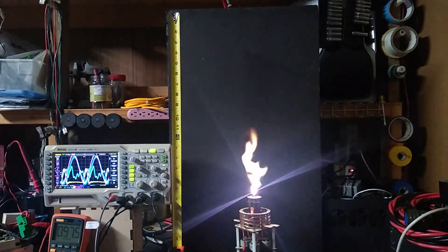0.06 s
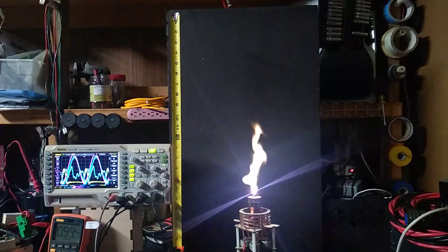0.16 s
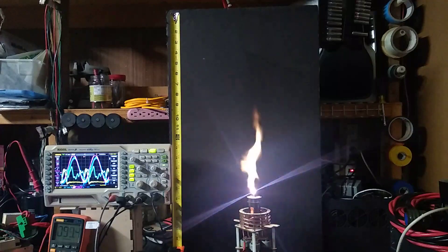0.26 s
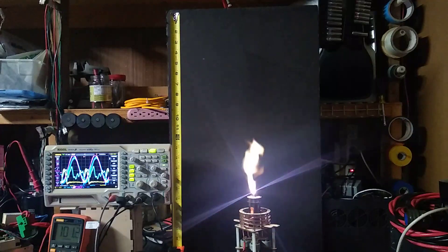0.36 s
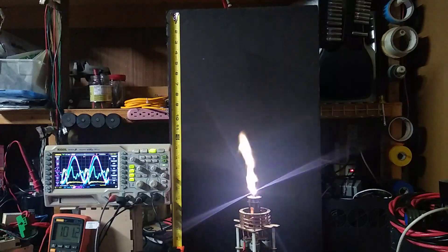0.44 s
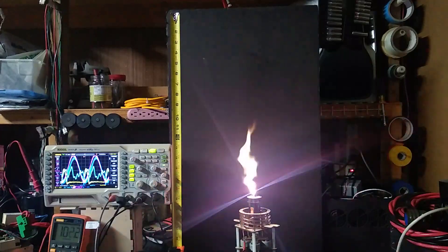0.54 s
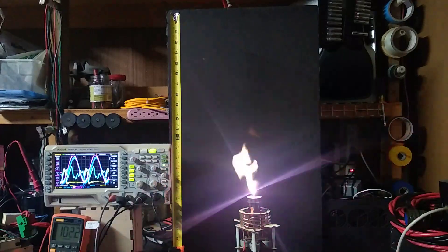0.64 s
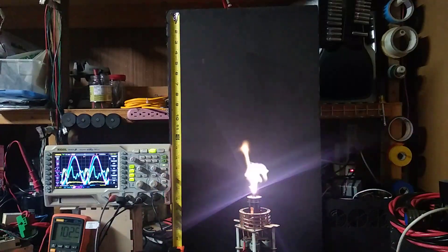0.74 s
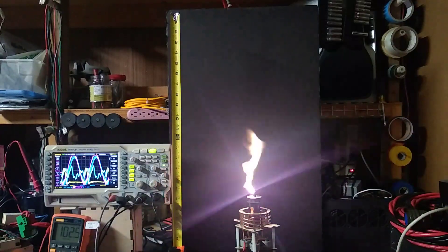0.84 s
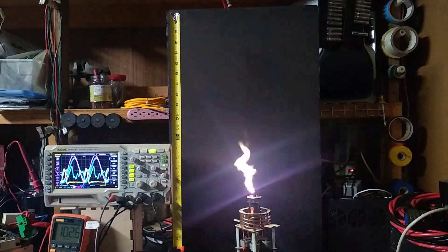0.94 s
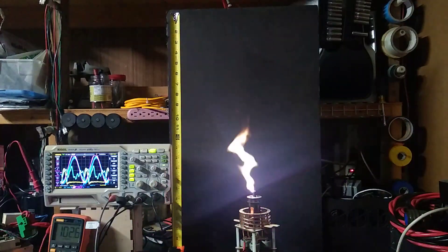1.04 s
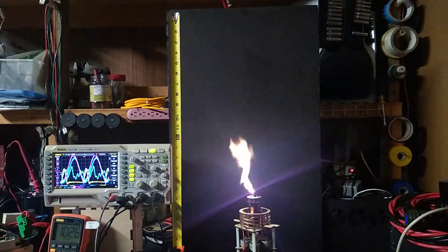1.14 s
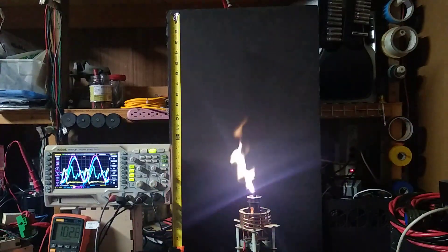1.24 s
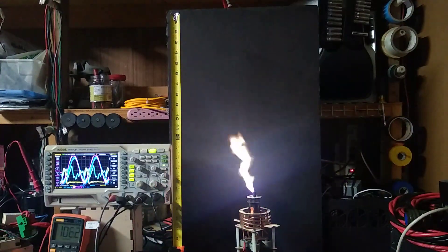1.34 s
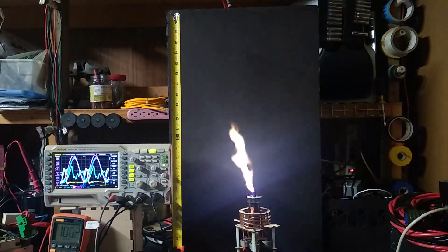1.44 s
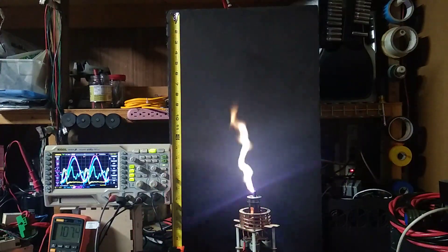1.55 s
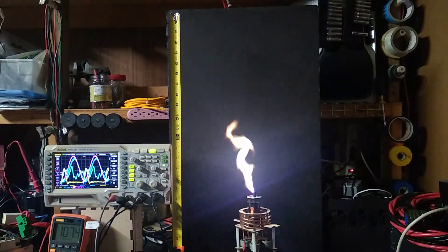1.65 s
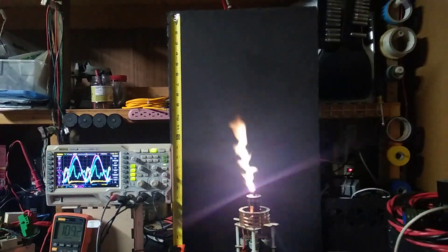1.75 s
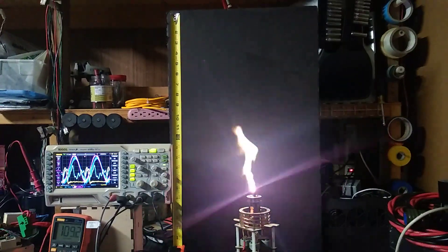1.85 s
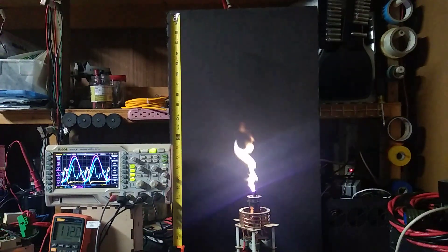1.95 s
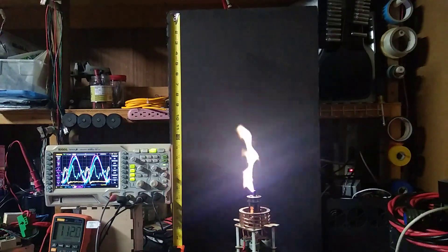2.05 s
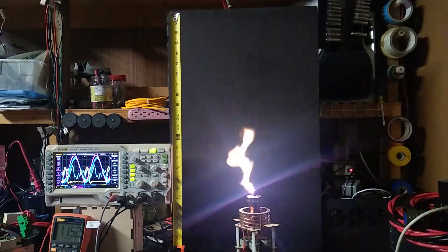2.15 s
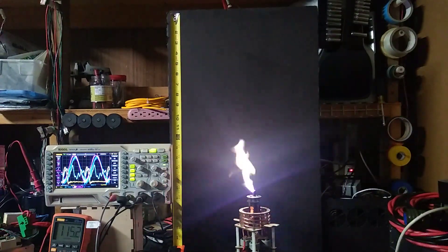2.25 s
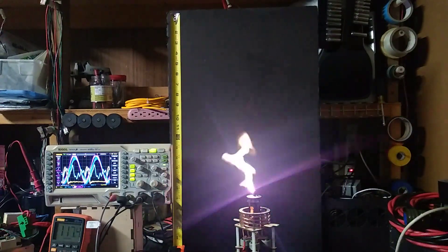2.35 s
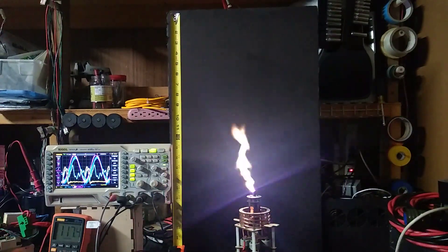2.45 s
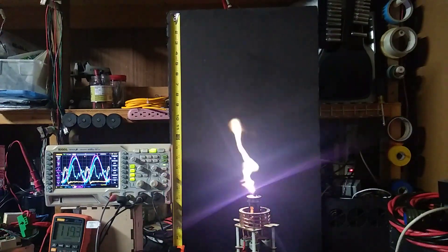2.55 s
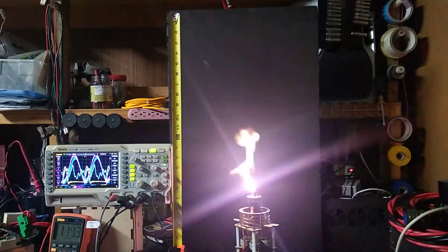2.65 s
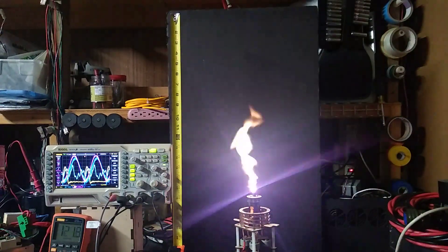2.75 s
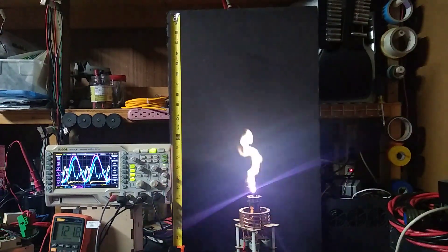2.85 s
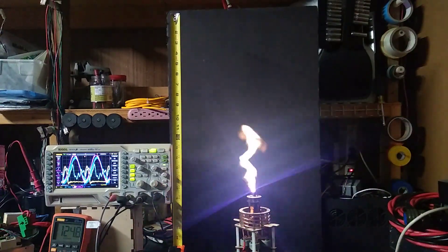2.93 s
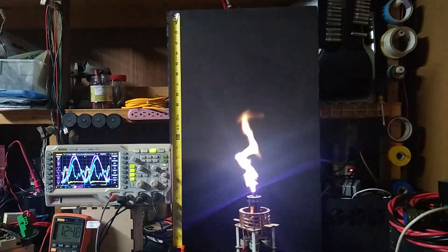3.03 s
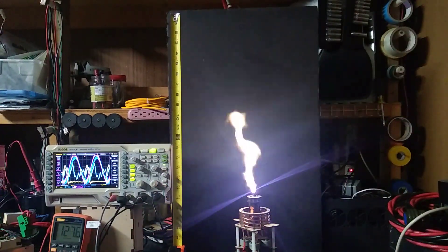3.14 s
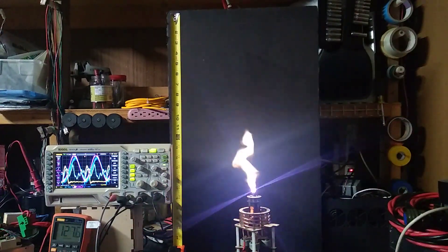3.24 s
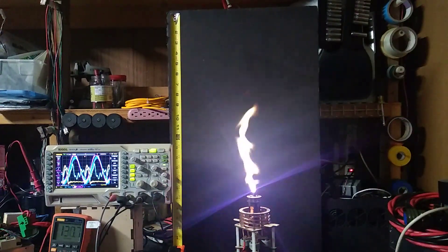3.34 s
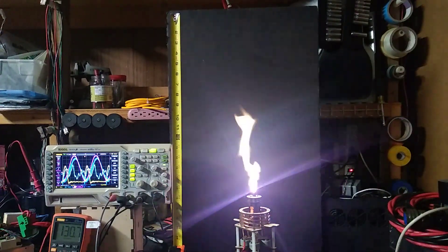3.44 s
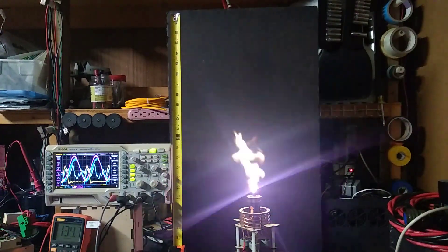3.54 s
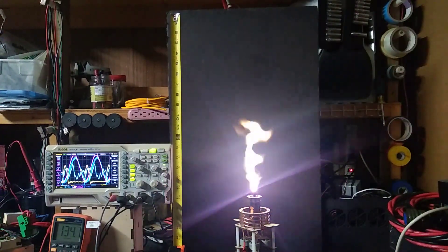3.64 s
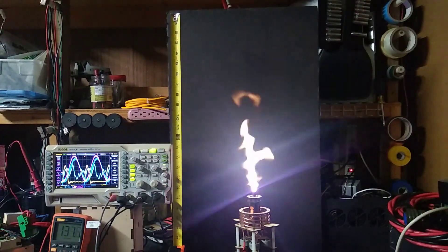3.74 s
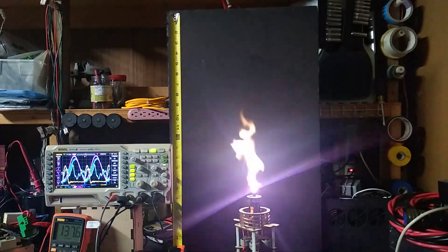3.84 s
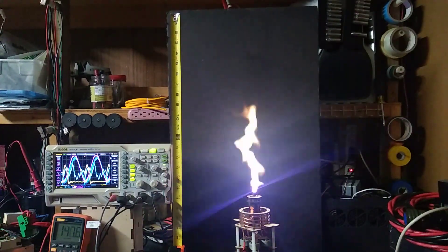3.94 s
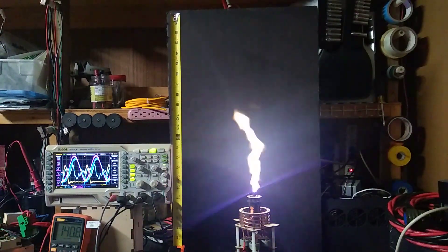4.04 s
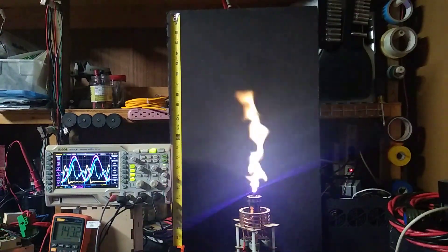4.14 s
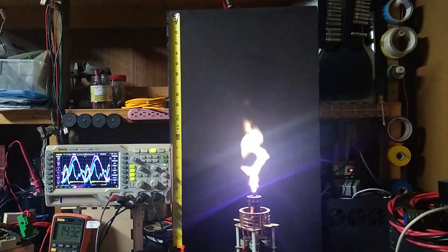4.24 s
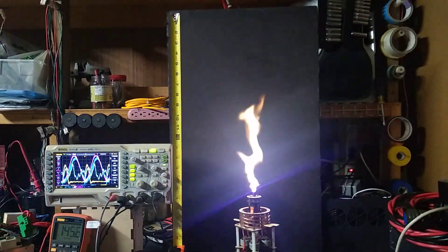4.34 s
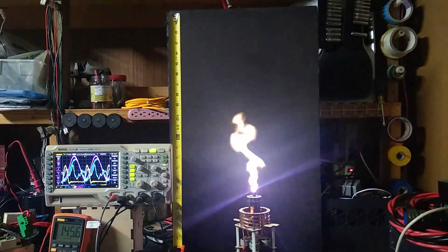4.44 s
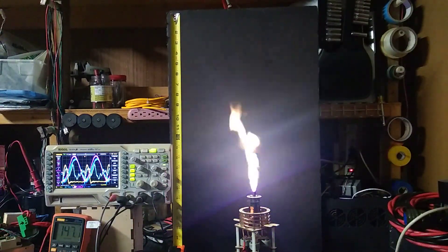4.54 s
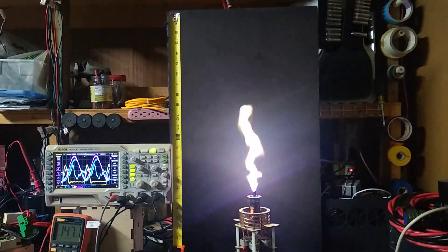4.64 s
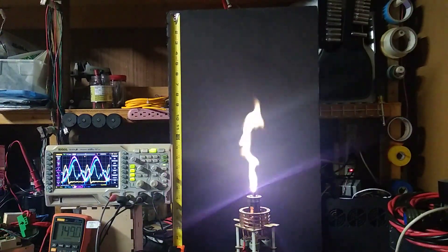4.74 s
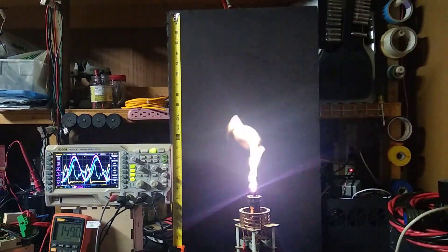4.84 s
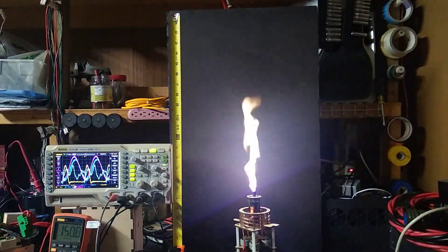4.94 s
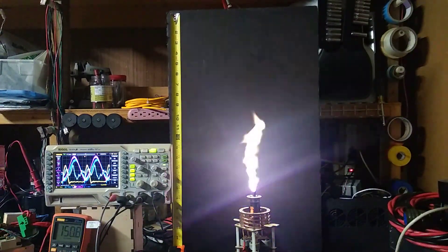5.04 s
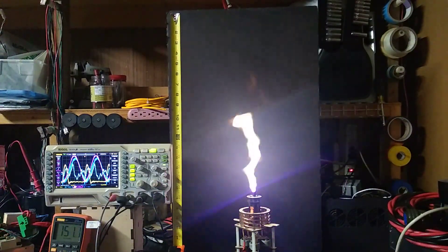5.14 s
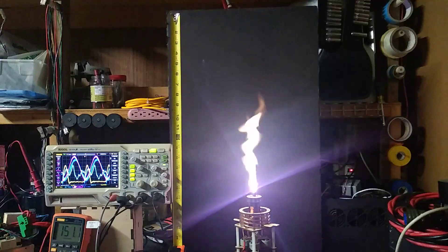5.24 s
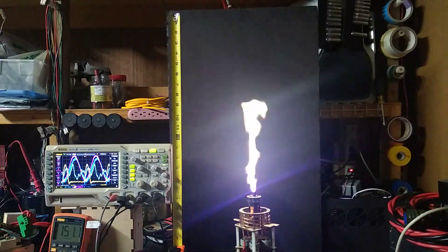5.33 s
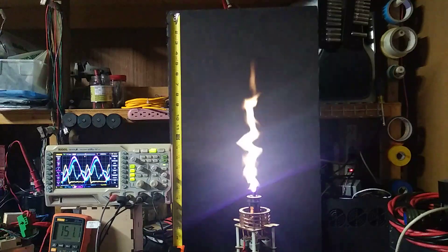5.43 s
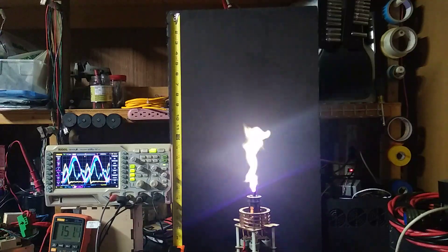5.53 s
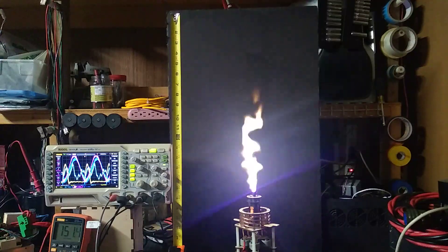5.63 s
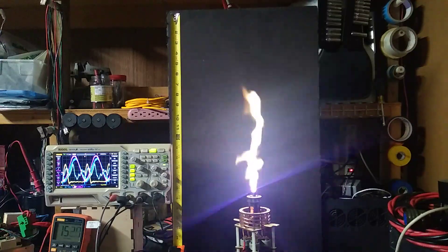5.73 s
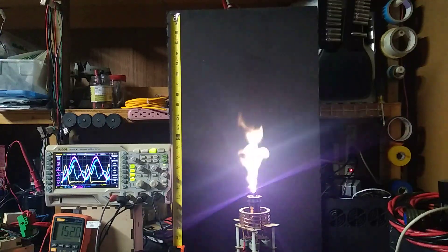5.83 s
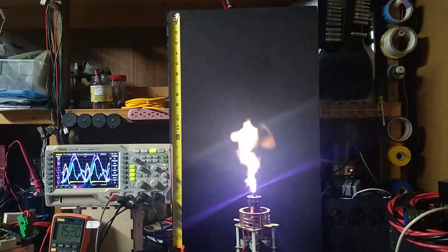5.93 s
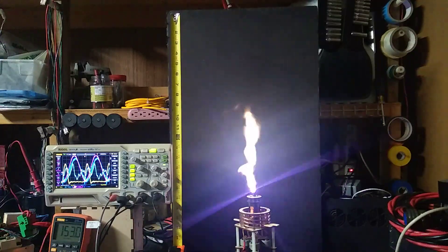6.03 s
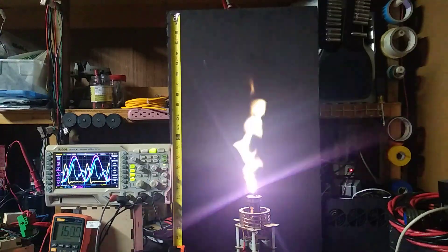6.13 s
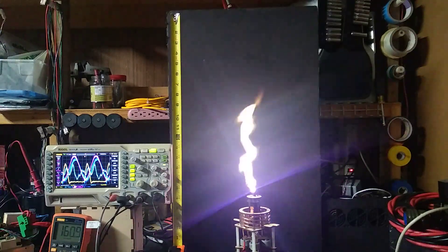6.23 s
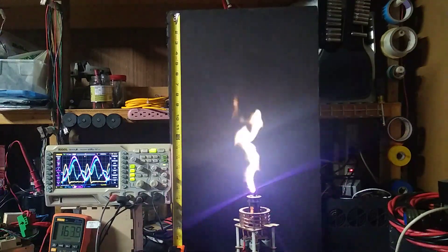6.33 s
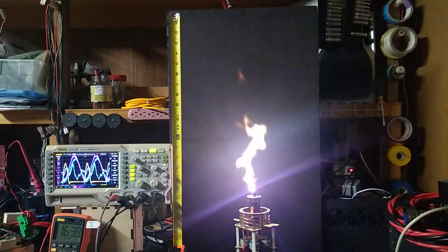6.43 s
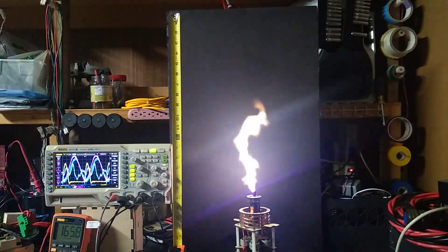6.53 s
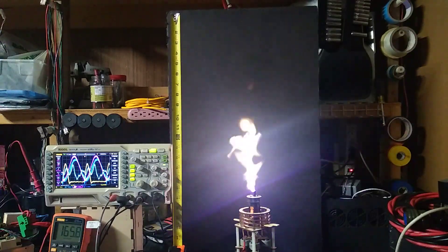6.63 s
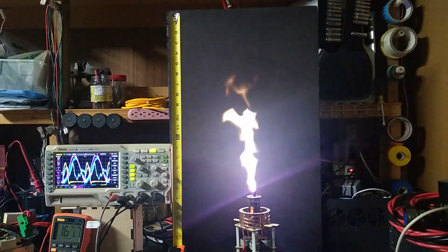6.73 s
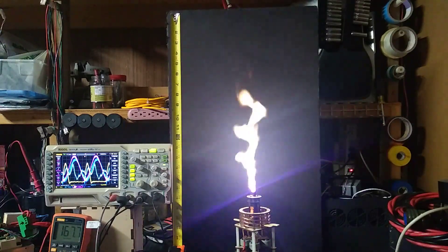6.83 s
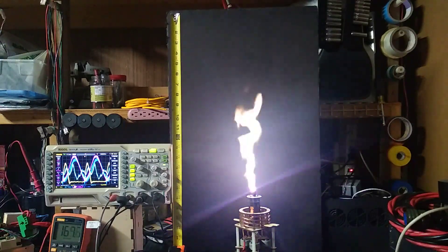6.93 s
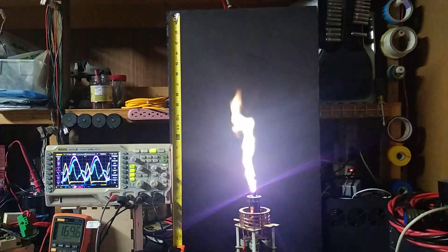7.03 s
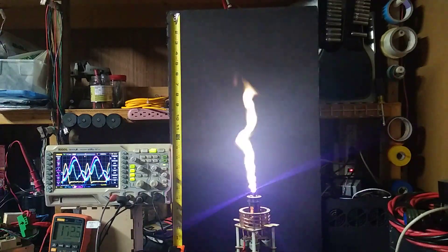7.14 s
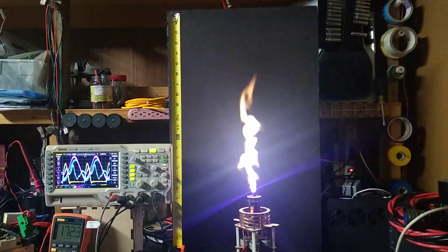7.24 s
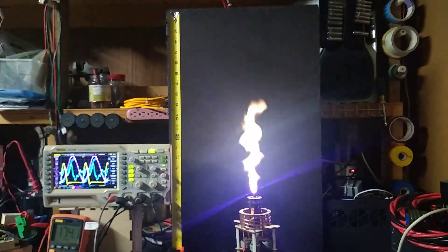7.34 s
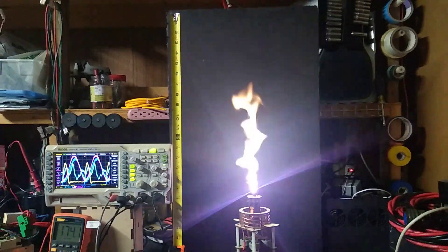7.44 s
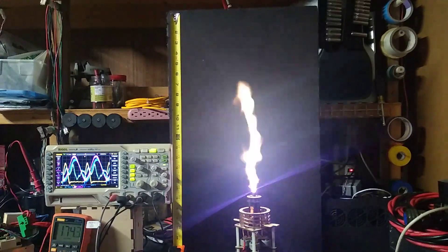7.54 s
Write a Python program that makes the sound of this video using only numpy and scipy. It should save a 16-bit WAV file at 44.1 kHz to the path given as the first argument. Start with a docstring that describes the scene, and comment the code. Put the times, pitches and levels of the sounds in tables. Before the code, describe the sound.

An electric arc burns continuously above a small coil in a cluttered indoor workshop, heard in dry stereo. From 0 seconds there is a quiet, steady buzz at about 120 hertz, with strong low overtones and a soft, flickering hiss. Small dry ticks fall at about 0.1, 0.15 and 0.6 seconds; sharper ones near 0.75 and 0.9 come with two tiny surges of the whole sound, the second stronger. Sparse ticks follow at 1.3, 2.1 and 2.75. The buzz stays low until about 2.2 seconds, then climbs rapidly through 2.8, dips slightly, and reaches its loudest, with a brighter, raspier edge, around 3.9. It eases, lifts again near 4.9, then settles a few decibels softer from about 6 seconds, its tone shifting slowly. The pitch stays constant while the treble flutters unevenly between sides. It continues to the end at about 7.5 seconds without fading out.

```python
"""An arc burns on top of a small coil in a cluttered workshop. Its supply ripples at twice the mains rate, so the
plasma swells 120 times a second: a buzz made of sines up to the treble, over the filtered noise of the flickering
channel. It starts quietly, with dry ticks (ringing modes and short noise) and two brief swells in level in the first
second. Then the supply is slowly turned up, which reshapes the ripple: the arc grows louder, the last ticks come
before three seconds, the arc is loudest at about four, and it burns on a little softer to the end."""
import sys
import numpy as np
from scipy import signal
from scipy.fft import rfft, irfft, next_fast_len
from scipy.io import wavfile

SR = 44100
rng = np.random.default_rng(int(sys.argv[2]) if len(sys.argv) > 2 else 0)


def to_wav(s):
    """Save 16-bit WAV."""
    ch = np.atleast_2d(s).T  # columns
    pcm = np.round(np.clip(ch, -1, 1) * 32767)  # PCM
    wavfile.write(sys.argv[1], SR, pcm.astype(np.int16))


N = 334278

# The course of the arc. Each row: time in seconds, buzz level in dB, supply setting from 0 (low) to 2 (high).
ARC_COURSE = [(0, -52.5, 0), (.8, -53, .03), (1.2, -53, .2), (1.6, -53, .35), (2.0, -52, .6),
              (2.2, -52, .65), (2.3, -49.5, .68), (2.37, -46.5, .7), (2.8, -43.5, .8), (3.0, -44, .8),
              (3.4, -41.5, .9), (3.9, -40, .97), (4.55, -41.5, 1.0), (4.9, -40.6, 1.02), (5.2, -42, 1.06),
              (5.7, -43, 1.15), (6.0, -42.5, 1.35), (6.2, -44, 1.5), (6.9, -44, 1.95), (7.58, -43.5, 2.0)]
# The lowest overtones. Each row: multiple of the ripple rate, level in dB against the buzz at supply setting 0,
# then at 1, then at 2, left over right in dB, lead of the left side in radians.
LOWER_OVERTONES = [(1, -22, -26, -23.5, 1.5, -0.8), (2, -4.5, -7.5, -8.5, 21, 3.5),
                   (3, -12, -11, -10.5, 7, 0.4), (4, -10.5, -9.5, -5.5, 5.5, 1),
                   (5, -8, -10, -8.5, 0.5, 0.5), (6, -6.5, -4, -9.5, 15, 0.3),
                   (7, -25.5, -24.5, -15.5, 7, 0.35), (8, -8.5, -12, -6.5, 1.5, -0.3),
                   (9, -18, -9.5, -13.5, 1, 0.19), (10, -29.5, -23.5, -21.5, -1, 0.1),
                   (11, -23.5, -18, -19.5, 3, 0.82), (12, -17.5, -23.5, -29, 2.5, -1.17),
                   (13, -24.5, -15.5, -22.5, 9, 1.4), (14, -34, -21, -34, 7, 2.2),
                   (15, -30.5, -19.5, -22, -1, -0.9), (16, -25, -30, -24, 10, 3),
                   (17, -28.5, -19.5, -28, 8.5, -2.5)]
# Outline of the upper overtones. Each row: frequency in Hz, typical level in dB against the buzz.
UPPER_OVERTONES = [(2280, -36), (2400, -18), (2760, -27), (2880, -18), (3120, -25), (3700, -24),
                   (4200, -29), (4900, -29), (5500, -33), (7000, -36), (7700, -43), (9800, -46),
                   (11100, -43), (11400, -34), (12000, -42), (12900, -43), (13350, -35), (13800, -42),
                   (14500, -41), (15600, -48)]
# Colour of the hiss. Each row: frequency in Hz, relative level in dB per Hz.
HISS_COLOUR = [(30, -23), (60, -6.5), (100, -3), (300, 1.5), (450, 4.5), (1000, -2.5), (2200, 2),
               (2900, -3.5), (4300, -8), (6000, -15), (8500, -23), (10400, -20), (11400, -21),
               (13400, -15.5), (15600, -22)]
# Timing between two microphone ports. Each row: frequency in Hz, lead of the left port in radians.
PORT_LEAD = [(100, -.8), (950, 0), (1500, .9), (2080, np.pi), (2350, np.pi), (2600, 2.5), (2950, .6),
             (3450, 0), (4000, -1.3), (4350, -np.pi), (4550, -np.pi), (4900, -1.6), (5600, -.5),
             (15000, -1.5)]
# Likeness of the ports. Each row: frequency in Hz, share of the hiss common to both (0 to 1), left over right in dB.
PORT_BALANCE = [(40, .3, 2), (100, .1, 2), (200, .5, 3), (500, .8, 4), (1800, .9, 2), (2100, .96, 0),
                (2350, .96, 0), (2800, .85, 1), (4000, .85, 1), (4300, .98, 0), (4600, .98, 0),
                (5100, .65, 3), (9000, .3, 4), (15000, .3, 4)]
# The dry ticks. Each row: time in seconds, nominal peak level in dB.
TICK_TIMES = [(0.1087, -63), (0.1494, -62), (0.6194, -63), (0.756, -52), (0.8365, -66), (0.9002, -48),
              (1.292, -59), (2.0944, -62), (2.745, -56)]
# Hard modes that a tick rings. Each row: frequency in Hz, level in dB against the tick, time to fall 60 dB in seconds.
TICK_RINGING = [(3550, -6, .009), (5900, -10, .006), (9800, -10, .006)]
# Brief swells of the whole buzz and hiss. Each row: start in seconds, length in seconds, extra level in dB.
LEVEL_SWELLS = [(0.747, 0.018, 3), (0.893, 0.0407, 10)]

# Each of these holds three values in dB, for supply settings 0, 1 and 2.
UPPER_LIFT_DB = (-14.5, -0.3, -5)   # lift of the upper overtones at 5 kHz
HISS_DB = (-12.5, -14.5, -14.5)     # hiss against the buzz level
BRIGHT_DB = (0.4, 2.2, 0.2)         # lift of the hiss above about 2 kHz, before its overall level is set

RIPPLE_HZ, CUTOFF_HZ = 120.01, 15750
RAGGED_DB = 2.6    # chance spread between upper overtones
WANDER_DB = 1.5    # slow level changes of an overtone, at 6 kHz
PATCHY_DB = 1.0    # flicker of each hiss band
SNAP_HZ, SNAP_SMEAR = 10400, .55   # overtones above this strike together once a cycle, blurred by radians
SWEEP, SWEEP_CENTRE = .36, 3.94    # radians per squared step of order, counted from this order
SWELL_EDGE_S, SWELL_SAG = .006, .45   # rise and fall time; share of the extra dB left just before the end
TICK_RISE_S = .0006                # softening of the start of a crack


def amp(db):
    """Turn a level in dB into a gain."""
    return 10 ** (np.asarray(db) / 20)


def in_time(rows):
    """Draw the columns of a timed table out to every sample."""
    seconds, *columns = np.transpose(rows)
    return [np.interp(np.arange(N) / SR, seconds, column) for column in columns]


def at_hz(points, hz, axis=1):
    """Read one column of a spectrum, in straight lines on a log-frequency axis."""
    points = np.array(points)
    return np.interp(np.log(hz), np.log(points[:, 0]), points[:, axis])


def at_setting(values, setting):
    """Read a quantity that is given at supply settings 0, 1 and 2."""
    return np.interp(setting, range(3), values)


def drift(rate, count):
    """Make slow chance curves by smoothing noise: one value per 256 samples, spread 1, faster for a higher rate."""
    r = np.exp(-512 * np.pi * rate / SR)
    noise = rng.standard_normal((count, N // 256 + 302))
    slow = signal.lfilter([1], [1, -2 * r, r * r], noise)[:, 300:]   # skip the filter's warm-up
    return slow / slow.std(axis=1, keepdims=True)


def spread(slow):
    """Draw slow values out to every sample."""
    return np.interp(np.arange(N) / 256, np.arange(len(slow)), slow)


def ticks(crack_db=-1.5, crack_s=0.0029, echo_db=-7.5, echo_s=.015):
    """Each tick rings a few hard modes over a short crack; the shelves scatter it back for a moment."""
    table = np.array(TICK_TIMES)
    at, peak_db = (table[:, 0] * SR).astype(int), table[:, 1]
    chance_db = rng.normal(0, 1.9, (len(at), len(TICK_RINGING)))
    clicks = np.full(N, 1e-18)   # tiny floor keeps the filters fast
    ringing = 0
    for (hz, level_db, t60), by_tick in zip(TICK_RINGING, chance_db.T):
        clicks[at] = amp(peak_db + level_db + by_tick)
        r, w = amp(-60 / (t60 * SR)), 2 * np.pi * hz / SR
        ringing = ringing + signal.lfilter([0, np.sin(w)], [1, -2 * r * np.cos(w), r * r], clicks)
    clicks[at] = amp(peak_db)
    fade = 0
    for db, seconds in ((crack_db, crack_s), (crack_db + echo_db, echo_s)):
        fade = fade + amp(db) * signal.lfilter([1], [1, -np.exp(-1 / (seconds * SR))], clicks)
    soft = np.exp(-1 / (TICK_RISE_S * SR))
    fade = signal.lfilter([1 - soft], [1, -soft], fade)
    dull_noise = signal.lfilter([.5], [1, -.5], rng.standard_normal((2, N)))
    return ringing + fade * dull_noise


def at_ports(common, own):
    """Sound reaches the ports with the lead and balance of each frequency, plus a part only one port hears."""
    size = next_fast_len(N)
    hz = np.maximum(np.arange(size // 2 + 1) * SR / size, 1)
    share = np.clip(at_hz(PORT_BALANCE, hz), 0, 1)
    half = np.array([[1], [-1]]) / 2   # half of each difference goes to either side
    both = np.sqrt(share) * rfft(common, size) * np.exp(1j * half * at_hz(PORT_LEAD, hz))
    single = np.sqrt(1 - share) * rfft(own, size)
    return (both + single) * amp(half * at_hz(PORT_BALANCE, hz, axis=2)), hz


def hiss(bright_db, throb=0.12):
    """The channel tears and re-forms: noise that throbs with the ripple and flickers band by band."""
    gate = 1 + throb * np.cos(2 * np.pi * RIPPLE_HZ * np.arange(N) / SR)
    white = rng.standard_normal((3, N)) * gate
    lines, hz = at_ports(white[0], white[1:])
    lines = lines * amp(at_hz(HISS_COLOUR, hz))
    band = np.clip(np.log2(hz / 60).astype(int), 0, 7)   # octaves
    together, own = drift(3.9, count=1)[0], drift(26.0, count=8)
    out = 0
    for b in range(8):
        flicker = spread(amp(PATCHY_DB * (1.1 * together + own[b])))
        lift = amp(bright_db * (b >= 5))
        out = out + flicker * lift * irfft(lines * (band == b))[:, :N]
    return out / out.std()


def swells():
    """The level swells briefly: extra dB for buzz and hiss that jump up, sag and drop away."""
    t, extra_db = np.arange(N) / SR, 0
    for start, length, db in LEVEL_SWELLS:
        end = start + length
        corners = [start, start + SWELL_EDGE_S, end, end + SWELL_EDGE_S]
        extra_db = extra_db + np.interp(t, corners, [0, db, SWELL_SAG * db, 0])
    return extra_db


def buzz(setting, flutter_db=2.0, steeper=0.44, one_port_db=5.0, waver=0.024, apart=2.2, smear=1.38):
    """The plasma swells with the ripple: every multiple is a sine with its own level and timing at each port."""
    count = int(CUTOFF_HZ / RIPPLE_HZ)
    setting = setting[::256]   # slow steps, as in drift
    steps = len(setting)
    upper_db = at_setting(UPPER_LIFT_DB, setting)
    wander, flutter, lean = drift(0.65, count=count), drift(13.8, count=count), drift(1.24, count=count)
    standing = rng.standard_normal((count, 3))   # standing waves raise, sink and shift overtones by chance
    # within a cycle each overtone peaks a little earlier than the one below it; the higher ones scatter in time
    order = np.arange(1, count + 1)
    scatter = rng.standard_normal(count)
    start = SWEEP * (order - SWEEP_CENTRE) ** 2 + smear * np.minimum(order / 24, 1) ** 2 * scatter
    start = np.where(order * RIPPLE_HZ > SNAP_HZ, SNAP_SMEAR * scatter, start)
    # the timing of the ripple wanders slowly, a little early or late, over many cycles
    early_late = waver * spread(drift(4.3, count=1)[0])   # radians of the ripple
    turn = np.exp(1j * (2 * np.pi * RIPPLE_HZ * np.arange(N) / SR + early_late))
    out, half = np.zeros((2, N)), np.array([.5, -.5])
    wheel = np.sqrt(2)   # gives each sine an effective level of 1
    for k in range(count):
        wheel = wheel * turn   # one more turn per cycle gives the next overtone
        hz = (k + 1) * RIPPLE_HZ
        if k < len(LOWER_OVERTONES):
            row = LOWER_OVERTONES[k]
            level_db = at_setting(row[1:4], setting)
            side_db, lead = row[4] * half, row[5]
            side_db = side_db - 10 * np.log10(np.mean(amp(2 * side_db)))   # the mean power stays
        else:
            level_db = at_hz(UPPER_OVERTONES, hz) + upper_db * (hz / 5000) ** steeper
            side_db = RAGGED_DB * standing[k, :2] + at_hz(PORT_BALANCE, hz, axis=2) * half
            lead = at_hz(PORT_LEAD, hz) + apart * standing[k, 2] * (5000 < hz < SNAP_HZ)
        # higher overtones feel the writhing of the channel more, and it reaches the two ports unevenly
        unrest = np.sqrt(hz / 6000)
        level_db = level_db + unrest * (WANDER_DB * wander[k] + flutter_db * flutter[k])[:steps]
        for port, late in enumerate((0, -lead)):
            port_db = side_db[port] + unrest * one_port_db * half[port] * lean[k, :steps]
            sine = (wheel * np.exp(1j * (start[k] + late))).real
            out[port] += spread(amp(level_db + port_db)) * sine
    return out


def scene():
    """Buzz and hiss share the loudness of the arc; the supply setting colours both, and ticks are added."""
    buzz_db, setting = in_time(ARC_COURSE)
    noise = amp(at_setting(HISS_DB, setting)) * hiss(at_setting(BRIGHT_DB, setting))
    arc = amp(buzz_db + swells()) * (buzz(setting) + noise)
    return ticks() + arc


def record(dry):
    """The top is cut steeply by a low-pass filter."""
    steep = signal.ellip(12, .5, 60, CUTOFF_HZ - 180, fs=SR, output="sos")
    return signal.sosfilt(steep, dry)


dry = scene()
out = record(dry)
to_wav(out)
```